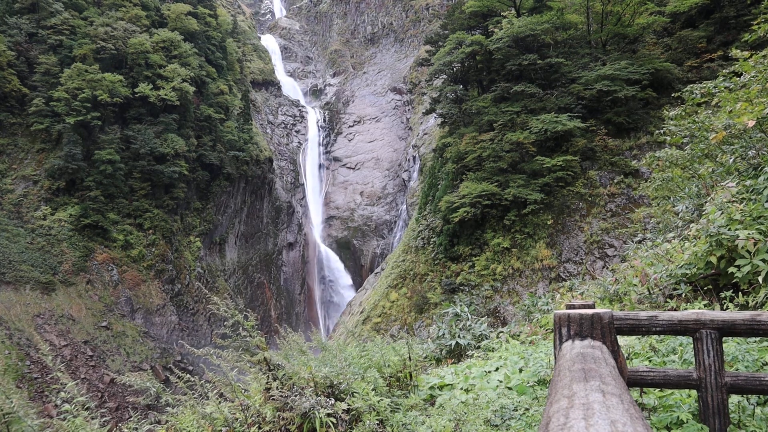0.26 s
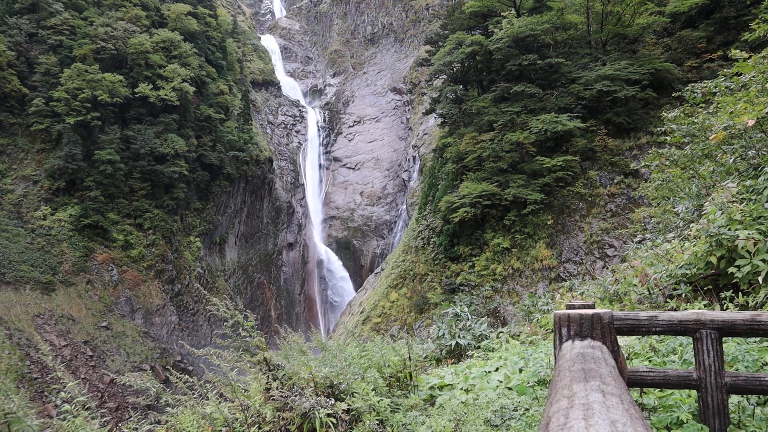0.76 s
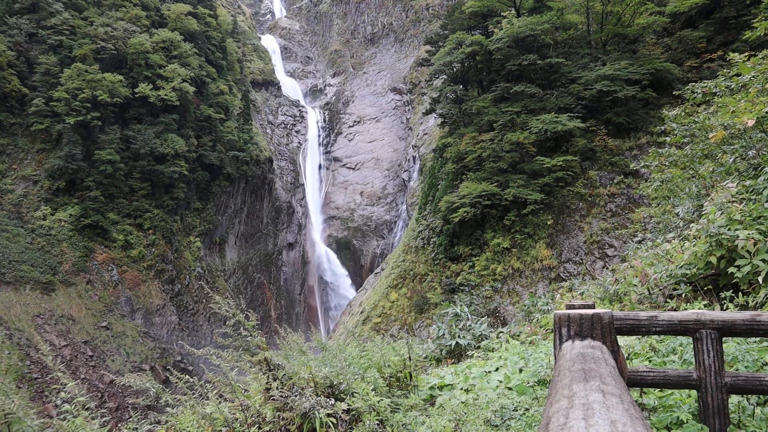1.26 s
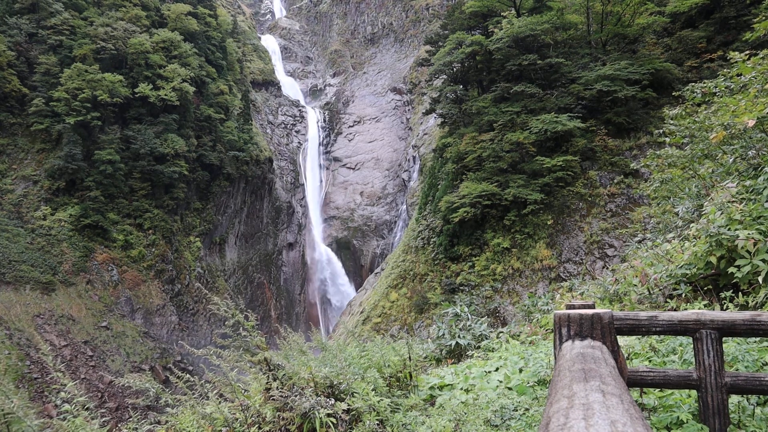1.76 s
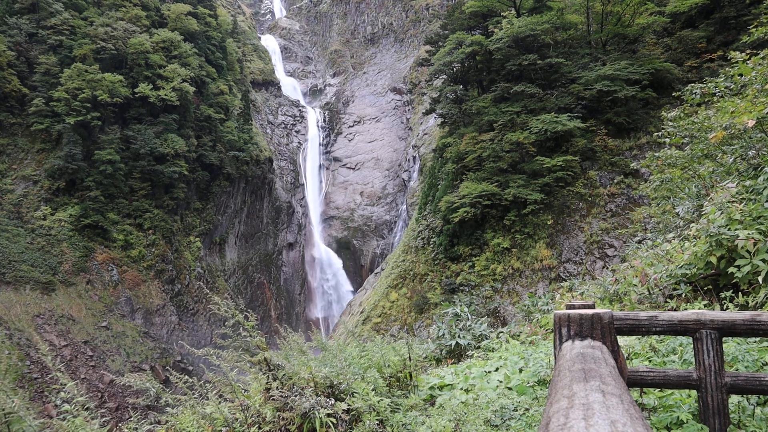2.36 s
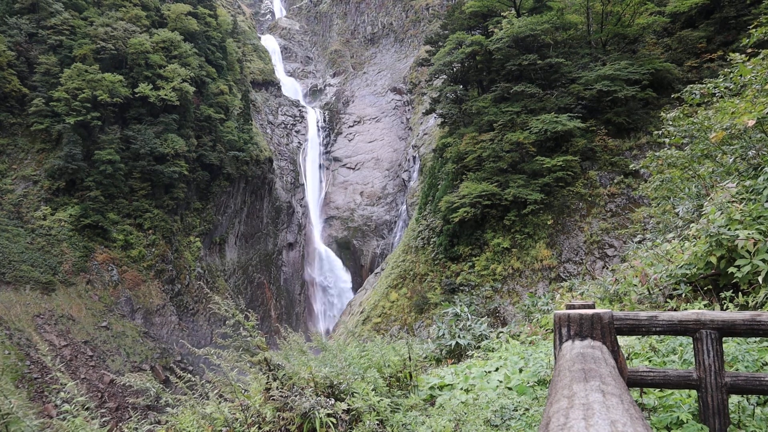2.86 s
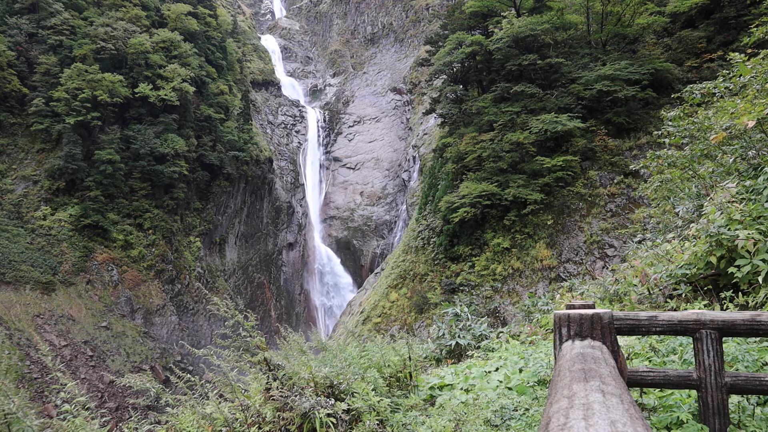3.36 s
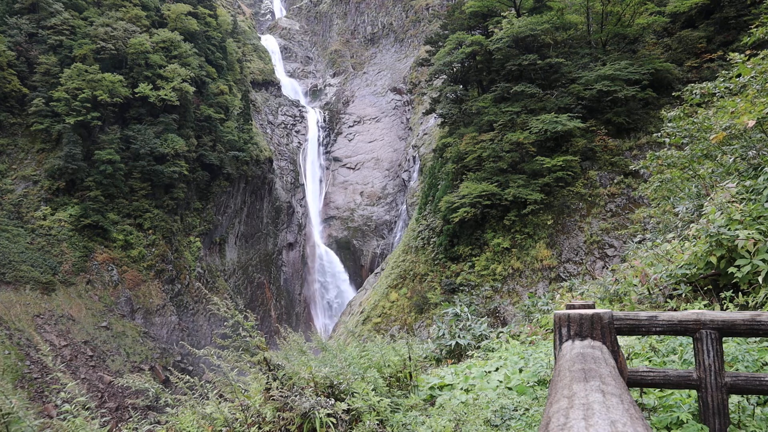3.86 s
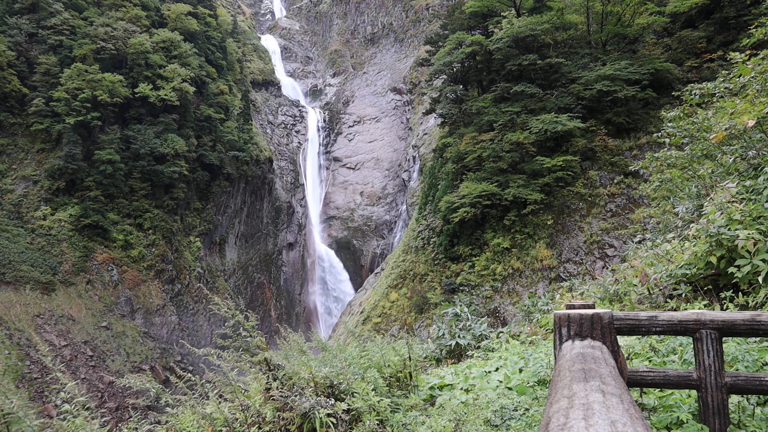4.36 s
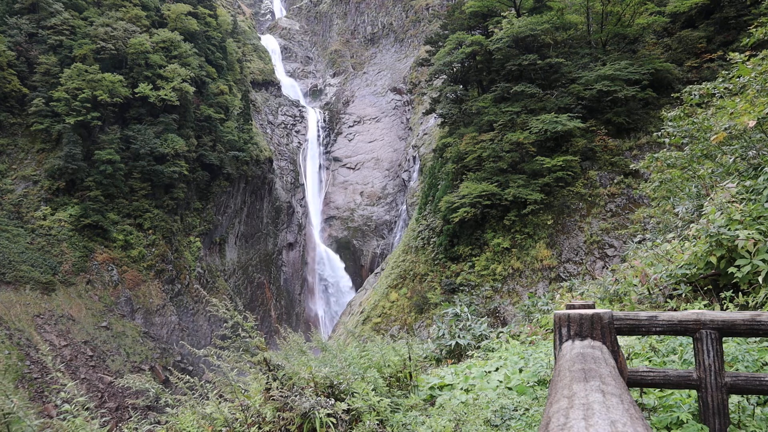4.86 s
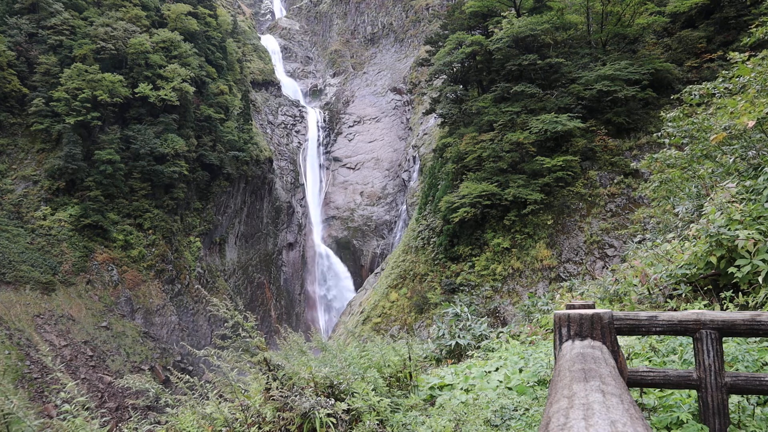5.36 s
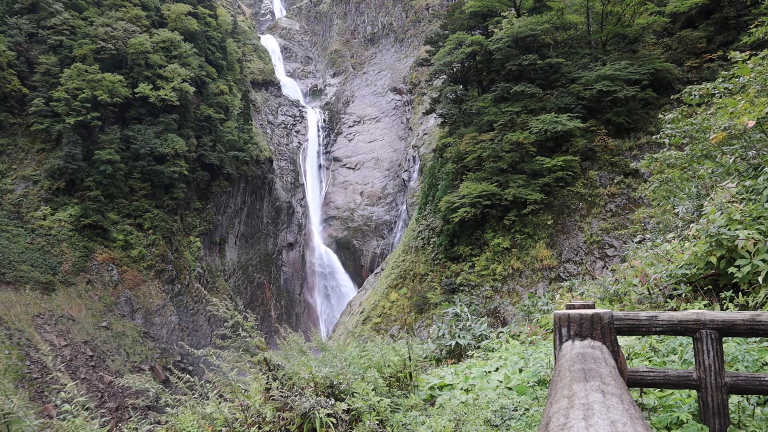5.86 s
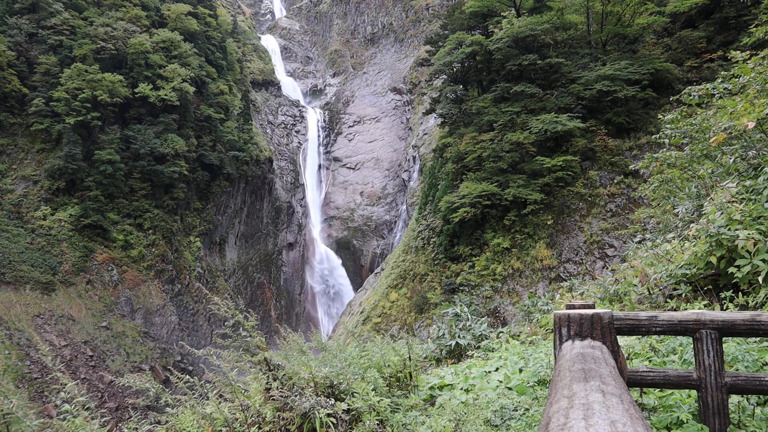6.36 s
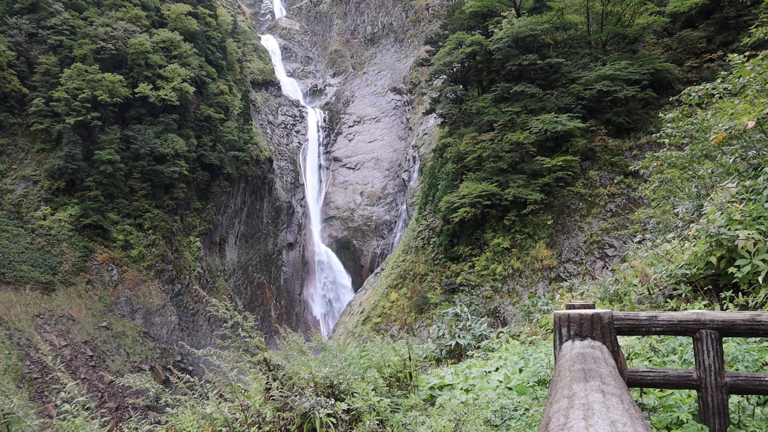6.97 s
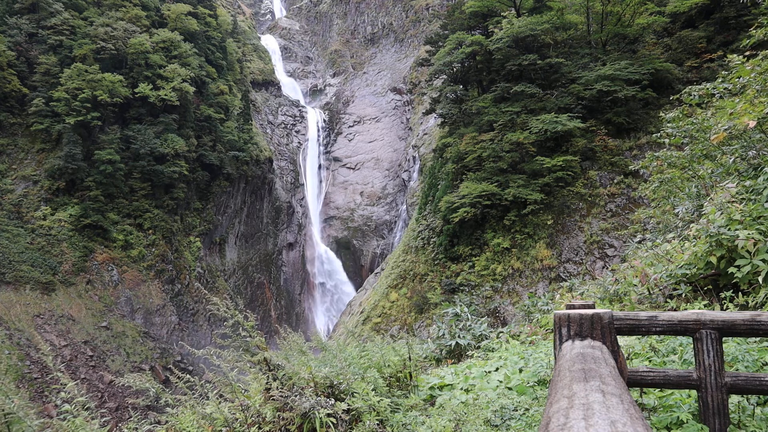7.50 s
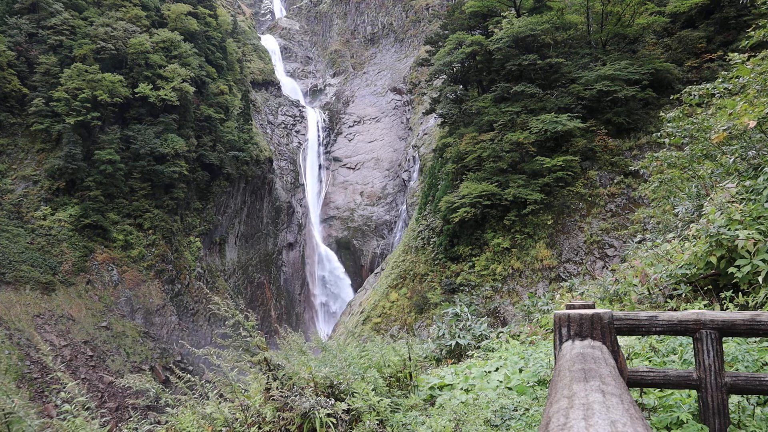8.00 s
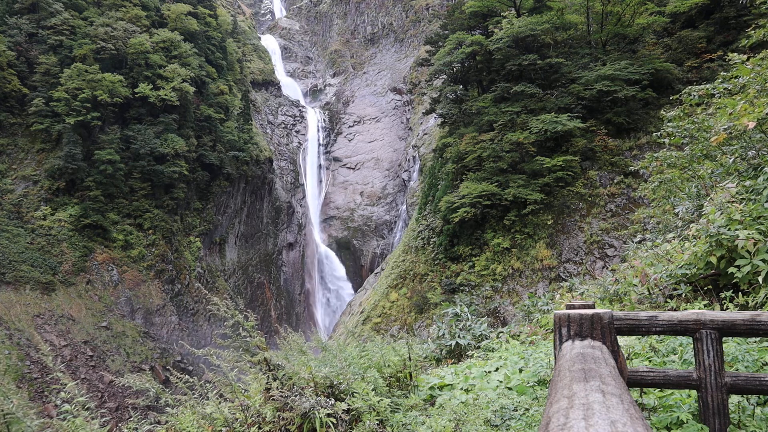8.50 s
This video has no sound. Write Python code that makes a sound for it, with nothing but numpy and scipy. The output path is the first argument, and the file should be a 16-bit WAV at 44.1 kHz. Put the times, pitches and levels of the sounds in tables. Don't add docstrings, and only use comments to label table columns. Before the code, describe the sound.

A tall distant waterfall roars steadily down a rock gorge, gently swelling with the wind, with one dull thump and sparse tiny spray ticks.

```python
import sys
import numpy as np
from scipy import signal
from scipy.fft import rfft, irfft, next_fast_len
from scipy.io import wavfile
from scipy.ndimage import uniform_filter1d

SR = 44100
rng = np.random.default_rng(int(sys.argv[2]) if len(sys.argv) > 2 else 0)


def generate_wav(signal):
    frames = np.transpose(np.atleast_2d(signal))
    scaled = np.clip(frames, -1, 1) * 32767
    pcm = np.round(scaled).astype(np.int16)
    wavfile.write(sys.argv[1], SR, pcm)


def attenuation_scalar(level_db):
    decades = np.asarray(level_db, float) / 20
    return 10 ** decades


N = 385434


def waterfall():
    # pitch_hz, level_db (per Hz)
    front_tone = [(18, -28), (38, -13), (62, -2.5), (85, -3), (136, -.5), (218, -1), (252, -3), (310, -2),
                  (500, -3.5), (800, -3.5), (1200, -7.5), (2950, -14), (3400, -18), (4500, -24)]
    # pitch_hz, level_db (per Hz)
    across_tone = [(20, -40), (70, -30), (118, -25), (162, -15), (264, -5), (442, -3), (682, -2), (1600, 1),
                   (2500, -0.5), (4000, -4.5), (5500, -11), (8500, -22.5), (11000, -30.5), (13200, -42)]
    # pitch_hz, level_db
    far_loss = [(4500, -.5), (6000, -8.5), (7500, -16), (8400, -21.5), (9200, -24.7), (10400, -25.8),
                (12000, -27), (13300, -37.5)]
    # pitch_hz, in_step (share), quarter_cycle_ahead (share)
    slant = [(100, 0.22, 0.11), (400, 0.56, 0.073), (900, .08, .05), (1500, -0.067, .3), (2300, 0.11, .3),
             (3560, 0.083, .38), (4970, 0.4, .15), (8000, .2, 0.), (12000, 0.18, 0.)]
    rumble, roar, rush, spray, mist, wall = surges()
    size = 2 * next_fast_len(N // 2 + 1)
    hz = np.fft.rfftfreq(size, 1 / SR)

    top_db = -6 * np.maximum(hz - 13300, 0) / 1000
    ahead, scattered = rfft(rng.standard_normal((2, size))) * attenuation_scalar(top_db)
    in_step, quarter = along(slant, hz)
    free = np.sqrt(np.clip(1 - in_step ** 2 - quarter ** 2, 0, 1))
    sideways = (in_step + 1j * quarter) * ahead + free * scattered

    front_db = along(front_tone, hz)[0] + along(far_loss, hz)[0]
    across_db = along(across_tone, hz)[0]
    front_surges = [rumble, roar, rush, spray, mist]
    across_surges = [rumble, roar, rush + wall, spray, .45 * mist]
    front = surging(ahead * attenuation_scalar(front_db), hz, front_surges, flicker_db=0.24)
    across = surging(sideways * attenuation_scalar(across_db), hz, across_surges, flicker_db=-0.1)
    front, across = level(front, -22), level(across, -29)
    return np.array([front + across, front - across])


def surges():
    # start_s, carry_db
    wind = [(0, -.5), (1.8, -0.44), (3.5, 0), (4.1, -0.1), (5.2, 0.3), (5.9, 0.7), (6.4, 0.4), (6.75, 1),
            (7.3, -0.3), (8.2, -0.4), (8.74, -1)]
    wind_share = [-0.64, .4, 1.4, 0.78, -0.19]
    # middle_s, length_s, level_db
    slugs = [
        (.38, 0.21, 2.2),
        (1.95, 0.6, 2),
        (2.95, 0.62, 1),
        (3.72, 0.21, 2),
        (4.3, .3, 4),
        (4.6, 0.21, 4),
        (4.85, 0.65, 1.2),
        (6.6, 0.27, 1),
        (7.72, .3, 1.5),
    ]
    # middle_s, length_s, level_db
    puffs = [
        (.1, .4, 0),
        (1.43, 0.21, 4),
        (2.1, .5, 2.5),
        (3.33, 0.22, 2),
        (4.0, 0.23, 3),
        (4.5, .35, 3),
        (5.25, 0.74, 3),
        (7.75, .3, 5),
        (8.1, 0.26, 3),
    ]
    # middle_s, length_s, level_db
    walls = [
        (2.25, .6, .8),
        (3.35, 1.1, 1.3),
        (7.4, .6, 1),
    ]
    rumble, roar, rush, spray, mist = np.outer(wind_share, played(wind)[0])
    slug_db = swells(slugs)
    rumble = rumble + slug_db
    roar = roar + 0.14 * slug_db
    mist = mist + swells(puffs)
    return rumble, roar, rush, spray, mist, swells(walls)


def surging(spectrum, hz, surge_db, flicker_db):
    layer_hz = [110, 500, 1700, 6000, 12000]
    out = 0
    for k, db in enumerate(surge_db):
        share = np.interp(np.log(hz + 1), np.log(layer_hz), np.arange(len(layer_hz)) == k)
        layer = irfft(spectrum * share)[:N]
        flicker = flicker_db * walk(6.) * (1 + .5 * k)
        out = out + layer * attenuation_scalar(db - db.mean() + flicker)
    return out


def walk(rate):
    k = int(SR / rate)
    held = np.repeat(rng.standard_normal(200), k)[:N]
    return 0.98 * uniform_filter1d(uniform_filter1d(held, k), k)


def along(table, hz):
    points, *columns = np.transpose(table)
    return [np.interp(np.log(hz + 1), np.log(points), c) for c in columns]


def played(table):
    s, *columns = np.transpose(table)
    return [np.interp(np.arange(N) / SR, s, c) for c in columns]


def swells(rows):
    t = np.arange(N) / SR
    return sum(db * np.cos(np.pi * np.clip((t - s) / length, -.5, .5)) ** 2 for s, length, db in rows)


def level(x, db):
    return x * attenuation_scalar(db) / np.sqrt(np.mean(x ** 2))


def ring(t, hz, t60, rise):
    t = np.maximum(t, 0)
    return np.sin(2 * np.pi * hz * t) * np.exp(-np.log(1000) * t / t60) * (1 - np.exp(-t / rise))


def thumps():
    # start_s, peak_db, pitch_hz, ring_s
    lumps = [
        (1.8361, -6, 400, .011),
    ]
    out, t = np.zeros(N), np.arange(1500) / SR
    for s, db, hz, t60 in lumps:
        swing = ring(t, hz, t60, rise=0.00063)
        start = int(s * SR)
        out[start:start + len(t)] += swing / swing.max() * attenuation_scalar(db)
    return out


def drops():
    # start_s, peak_db, pitch_hz, left_late (samples)
    hits = [(.161, -42, 10500, 1), (1.3866, -32, 10500, .8), (1.3935, -36, 8500, 1.5),
            (1.43, -39, 11500, 1), (1.4678, -28, 9700, 2.8), (1.517, -39, 10000, 1),
            (1.5325, -12, 9400, 2.8), (2.16, -41, 10000, 1), (2.2256, -37, 10500, .5),
            (2.2345, -19.5, 9400, 1.2), (3.327, -42, 10500, .5), (3.3435, -36, 14000, 1),
            (3.3463, -31, 11500, .3), (4.953, -43, 10500, .3), (5.505, -42, 10000, 1),
            (5.837, -43, 10000, .5), (6.394, -42, 10500, 1), (8.09, -43, 10500, 1.5)]
    # pitch_ratio, level_db, ring_ratio
    leaf = [(.67, -8., 2.4), (1., 0., .8), (1.2, -2., .7), (1.42, -10., .6), (1.6, -18., .6)]
    leaf_ring_s, pan_db_per_sample = .0017, 1.4
    out, t = np.zeros((2, N)), np.arange(400) / SR
    splatter_band = signal.butter(2, [6000, 13000], "band", fs=SR)
    for (s, db, hz, late), chance in zip(hits, rng.standard_normal((len(hits), len(t)))):
        splatter = signal.lfilter(*splatter_band, chance) * attenuation_scalar(-30) * np.exp(-t / 0.001)
        start = int(s * SR)
        for port in range(2):
            since = t - (1 - port) * late / SR
            tick = 0
            for ratio, swing_db, ring_ratio in leaf:
                pitch = min(hz * ratio, 15500)
                tick = tick + attenuation_scalar(swing_db) * ring(since, pitch, leaf_ring_s * ring_ratio, rise=.00012)
            tick = tick / np.abs(tick).max() + np.interp(since, t, splatter)
            out[port, start:start + len(t)] += tick * attenuation_scalar(db - port * pan_db_per_sample * late)
    return out


def scene():
    return waterfall() + thumps() + drops()


def roll_off(x):
    return signal.sosfilt(signal.butter(12, 16000, fs=SR, output="sos"), x)


def record(dry):
    return roll_off(dry)


dry = scene()
out = record(dry)
generate_wav(out)
```